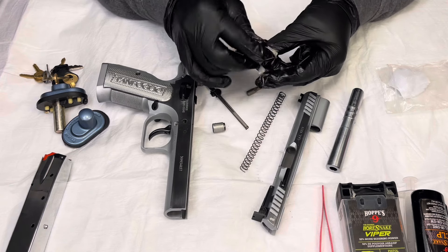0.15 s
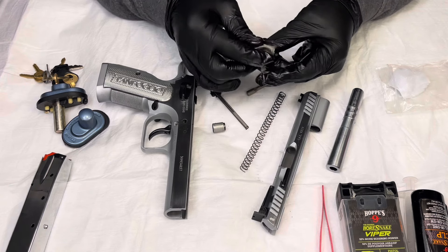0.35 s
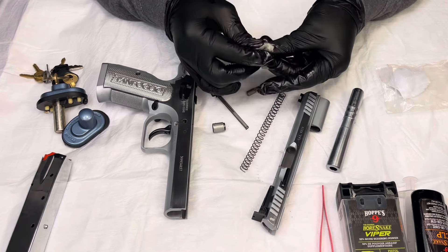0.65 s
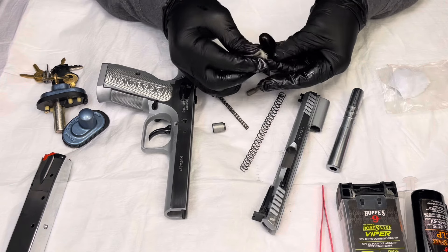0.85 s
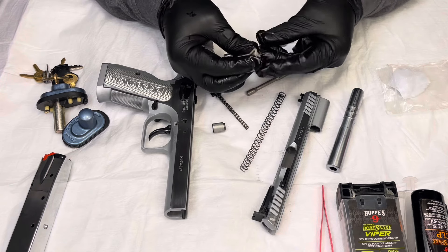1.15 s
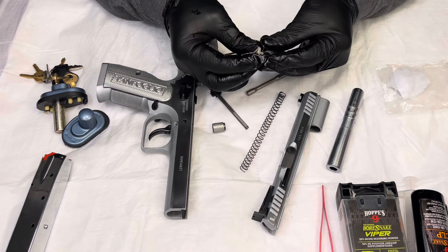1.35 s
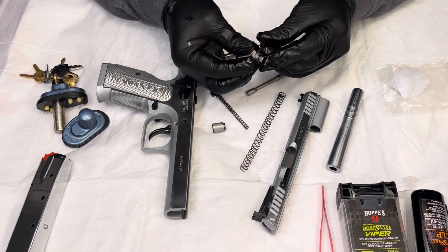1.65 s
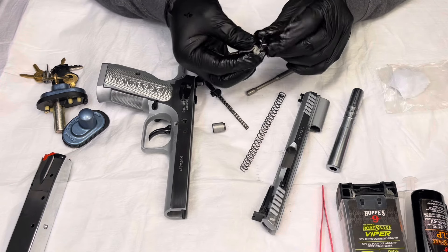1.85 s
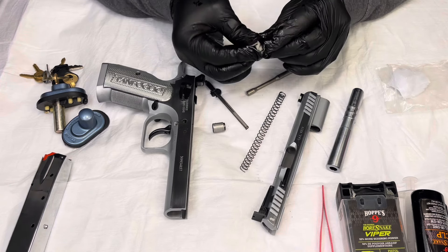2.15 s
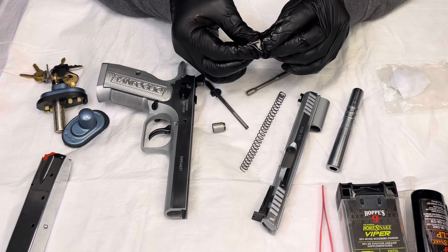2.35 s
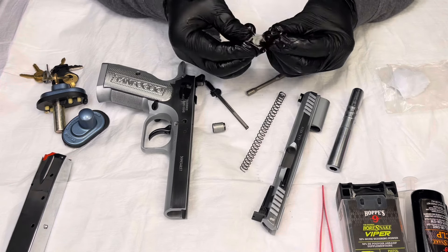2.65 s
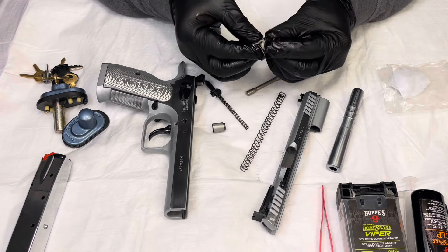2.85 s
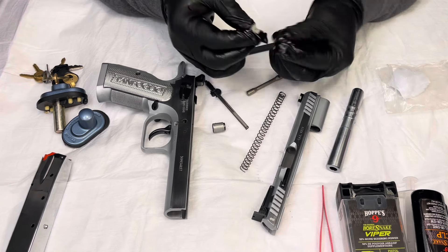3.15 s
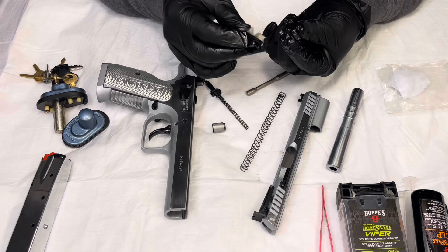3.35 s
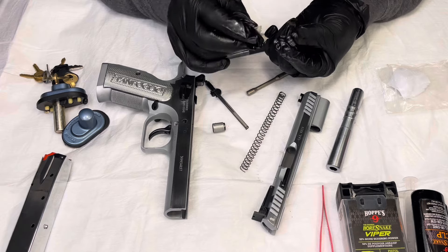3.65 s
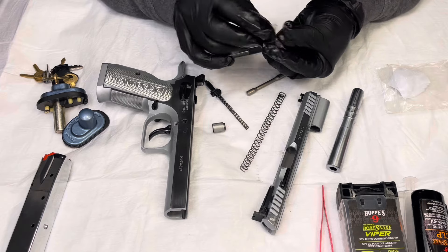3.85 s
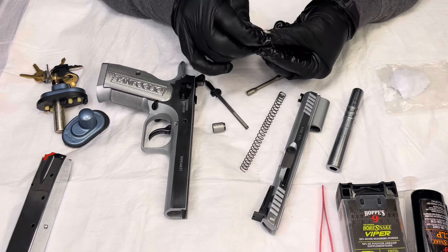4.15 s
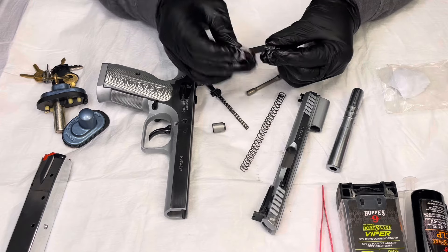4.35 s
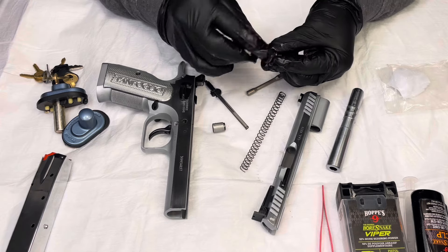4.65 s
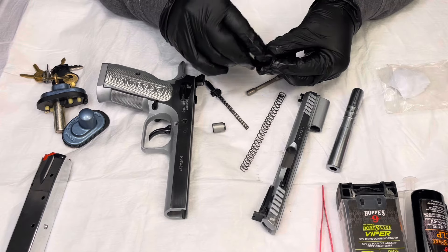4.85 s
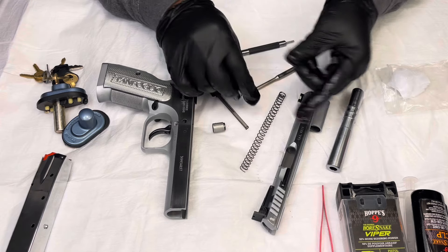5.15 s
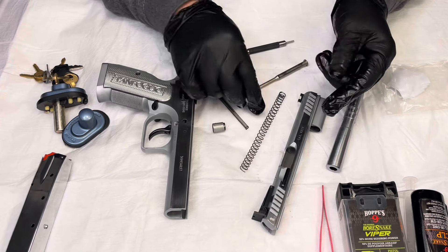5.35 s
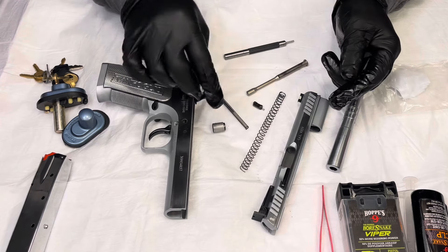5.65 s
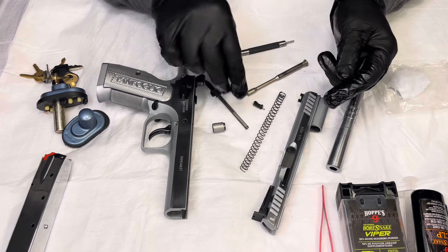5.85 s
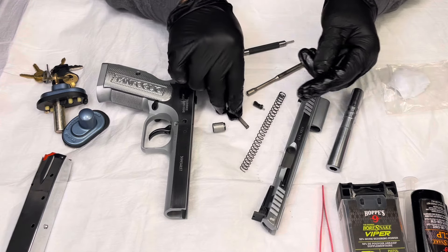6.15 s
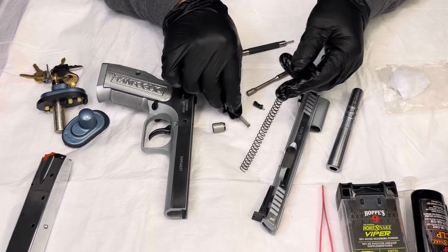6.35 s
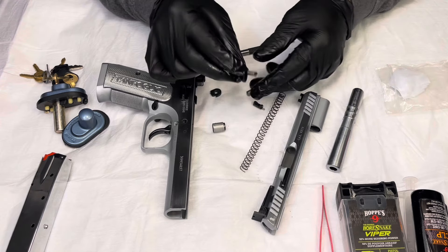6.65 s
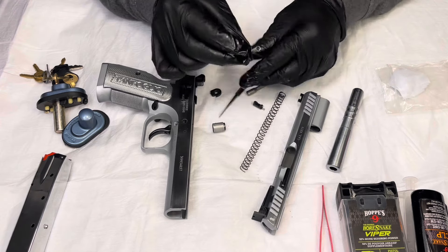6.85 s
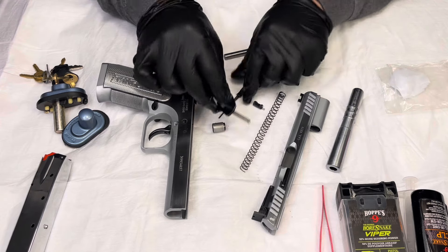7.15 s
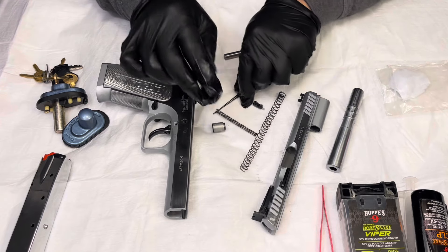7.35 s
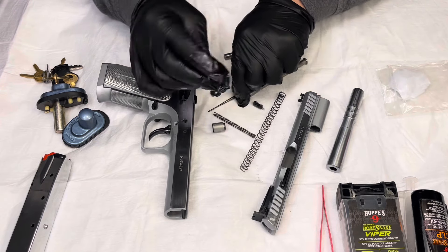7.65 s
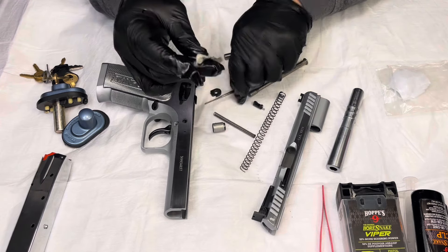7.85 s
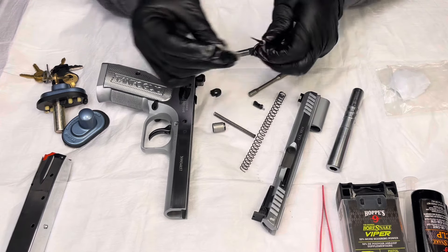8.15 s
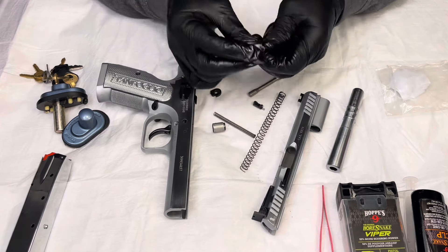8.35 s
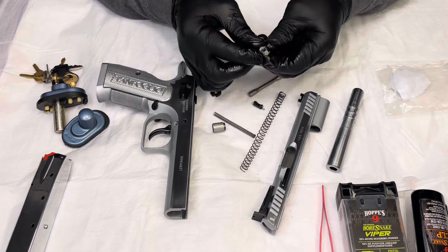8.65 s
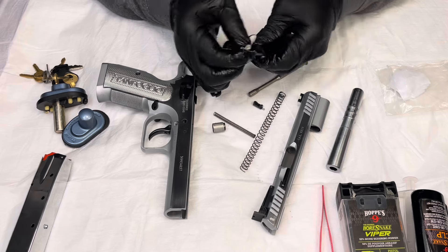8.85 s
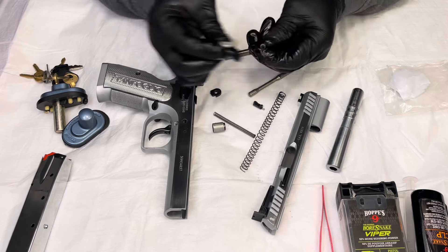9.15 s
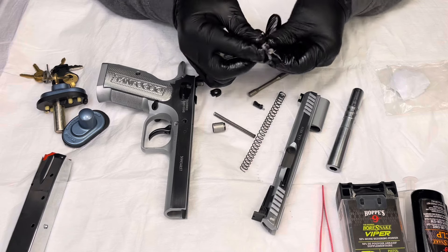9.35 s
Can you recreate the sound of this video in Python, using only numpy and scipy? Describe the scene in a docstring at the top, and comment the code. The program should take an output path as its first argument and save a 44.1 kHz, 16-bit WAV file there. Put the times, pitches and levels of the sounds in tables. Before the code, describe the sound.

Close up in a quiet room, rubber gloves rub in short, dry, hissy strokes with tiny snaps and barely audible squeaks. A dull soft thud comes past halfway, then a loud hard knock of a small part on a cloth-covered table and a weaker bounce. Thin steel rods click and ping briefly, then only fuller rustling continues. A distant motor hums very low beneath, in stereo.

```python
"""A quiet room, close to a two-port microphone: gloved hands work small steel pins over a cloth-covered table.
The gloves rustle (shaped noise), tick (bursts of a few cycles) and squeak faintly (gliding tones).
Parts knock on the table top (short noise through its modes); thin rods click and ping (paired modes).
A motor hums far off (wavering sine lines) under air noise; sparse echoes, near and wide, give the room."""
import sys
import numpy as np
from scipy import signal
from scipy.fft import rfft, irfft, next_fast_len
from scipy.io import wavfile
from scipy.ndimage import uniform_filter1d

SR = 44100
rng = np.random.default_rng(int(sys.argv[2]) if len(sys.argv) > 2 else 0)


def dump_mix(stems):
    """Bounce the given channels to the path in sys.argv[1] as a 16-bit WAV at rate SR."""
    frames = np.atleast_2d(stems).T  # one column per channel
    limited = np.clip(frames, -1, 1)  # hard clip at full scale
    pcm = np.round(limited * 32767).astype(np.int16)
    wavfile.write(sys.argv[1], SR, pcm)


N = 419832  # samples
SIZE = next_fast_len(N + 8192)  # padded transform length, samples
HZ = np.fft.rfftfreq(SIZE, 1 / SR)

# Levels in the tables are at the source, before any waver, room echo or microphone response.
# Air noise spectrum, relative: pitch_hz, density_db [dB per Hz]
AIR_SPECTRUM = [(15, -31), (25, -4), (59, -2.5), (106, -3.5), (245, -5.5), (294, -7.5), (345, -12.5),
                (405, -7.5), (505, -14.5), (832, -20.5), (1610, -38.5), (2660, -43), (3000, -36.5),
                (3900, -74), (6600, -120)]
AIR_DB = -57  # rms
# Lines of the distant motor: pitch_hz, level_db [dB rms]
MOTOR_LINES = [(49.2, -66), (59.3, -62), (98.3, -65.5), (147.5, -69.5), (196.7, -68), (245.9, -66.5),
               (295.1, -62.5), (393.4, -67), (442.6, -72.5)]
# Colour of glove rubbing on glove, relative: pitch_hz, density_db [dB per Hz]
GLOVE_SPECTRUM = [(700, -5), (1500, -14.5), (2300, -7), (3000, -7), (4000, 1.23), (5000, -2.5),
                  (6500, -9.5), (8500, -6.5), (10500, -4), (11500, -8), (12500, -22.5), (13500, -30.5),
                  (16000, -40)]
# Strokes of glove on glove: peak_s, length_s, rising_share [0-1 of length], peak_db, brightness [dB per octave]
GLOVE_STROKES = [(0.067, 0.122, 0.56, -57.5, 1.5), (0.317, 0.081, 0.24, -67, 7.5),
                 (0.383, 0.097, 0.23, -62.5, 1), (0.408, 1, 0.38, -72.5, 0.5), (0.516, 0.053, 0.33, -72, 6),
                 (0.772, 0.15, 0.56, -61.0, 4.5), (0.92, 0.095, 0.5, -72.5, 10.5),
                 (1.175, 0.178, 0.88, -70.5, 1.5), (1.263, 0.19, 0.66, -71, 4.5),
                 (1.385, 0.055, 0.43, -76, 9), (1.526, 0.18, 0.05, -66.5, 4), (1.727, 0.18, 0.67, -58, 3),
                 (1.79, 0.21, 0.14, -63.5, 6.5), (2.01, 0.16, 0.47, -63.5, -0.5),
                 (2.198, 0.14, 0.42, -58.5, -1), (2.268, 0.059, 0.83, -61, -2), (2.511, 0.2, 0.27, -64, 1),
                 (2.611, 0.095, 0.66, -56, 5), (2.772, 0.13, 0.6, -67.0, -1.5),
                 (2.889, 0.12, 0.36, -54, 1.5), (3.057, 0.19, 0.21, -56, 2.5),
                 (3.208, 0.06, 0.32, -59.5, 5.5), (3.328, 0.21, 0.35, -69.5, 1.5),
                 (3.654, 0.12, 0.35, -61.5, 4.5), (3.883, 0.037, 0.5, -51, 2.5),
                 (3.985, 0.44, 0.87, -67, 1), (4.093, 0.096, 0.66, -65, 0), (4.25, 0.078, 0.53, -47.5, 2.5),
                 (4.37, 0.069, 0.53, -49, 6.5), (4.484, 0.292, 0.89, -61, 1),
                 (4.6, 0.088, 0.69, -56.0, 4.5), (4.757, 0.17, 0.85, -64.5, 2),
                 (4.87, 0.098, 0.56, -58.5, 4.5), (5.008, 0.052, 0.2, -58.5, 5),
                 (5.142, 0.5, 0.33, -70.5, 2.5), (5.495, 0.12, 0.2, -66, 10),
                 (5.672, 0.2, 0.3, -69.5, 15.5), (5.709, 0.077, 0.34, -68, -8),
                 (5.88, 0.11, 0.23, -66, 2.5), (5.961, 0.042, 0.22, -60, 5.5),
                 (6.123, 0.108, 0.76, -60.0, 1.5), (6.183, 0.19, 0.47, -67, -2.5),
                 (6.512, 0.17, 0.38, -61, 2.5), (6.626, 0.077, 0.44, -54.5, -0.5),
                 (6.892, 0.43, 0.66, -54.5, -4.0), (7.222, 0.11, 0.65, -56, 3.5),
                 (7.334, 0.38, 0.51, -62, 5.0), (7.503, 0.141, 0.47, -65, 2),
                 (7.602, 0.37, 0.1, -63.5, 4.0), (7.69, 0.13, 0.13, -60.5, 0.5),
                 (7.954, 0.12, 0.14, -59.5, -1), (8.208, 0.42, 0.9, -62.0, 3.5),
                 (8.305, 0.24, 0.23, -55.0, 0), (8.397, 0.24, 0.58, -54, 3), (8.47, 0.047, 0.8, -51.5, 1.5),
                 (8.517, 0.073, 0.26, -55.5, 1), (8.605, 0.074, 0.64, -57, 1.5),
                 (8.743, 0.16, 0.65, -53, -1.5), (8.829, 0.36, 0.6, -60, 2.5),
                 (9.096, 0.184, 0.6, -63, 3.5), (9.276, 0.12, 0.41, -56.5, 1),
                 (9.424, 0.62, 0.14, -53.5, 2.5)]
REST_DB, REST_BRIGHT_DB = -79.5, 0.1  # the gloves never lie quite still; dB, dB per octave
EDGE_DROP_DB, ROUNDNESS = 13, 1.2  # a stroke is this much weaker at its ends; 1 = pointed, 2 = round
PATCHY_DB, MOTTLE_DB = 1.8, 3.3  # rms depth of the broad patches and of the narrow whistles
# Glove creases and fingertips snapping: start_s, peak_db, centre_hz, top_click_db [relative to peak_db]
GLOVE_TICKS = [(1.5224, -59, 6050, -13), (2.0083, -53, 3870, -22), (2.063, -46, 4400, -5),
               (3.873, -43.5, 3820, -10), (4.1525, -52, 8090, -13), (4.46, -47, 3780, -23),
               (4.9566, -62.5, 3800, -11), (4.9925, -61, 7000, -2), (5.0102, -38, 5960, 7),
               (5.0154, -45.5, 4050, -13), (5.9229, -57, 5860, -8), (5.964, -50, 6100, -5),
               (6.604, -48, 4520, -21), (7.1977, -56, 5700, -10), (7.8535, -54, 5655, -16.5),
               (7.9355, -61.5, 5660, -11), (8.117, -46, 5530, -22), (9.2296, -50.5, 4360, -12.5)]
# Echo decay by band, before each echo set scales it: pitch_hz, t60_s
ROOM_DECAY = [(100, 0.99), (260, 0.3), (700, 0.54), (1840, 0.46), (3000, .32), (4850, 0.28), (7500, .18),
              (12000, 0.13)]
SCATTER_HZ = 500.  # echoes of the bass reach both ports alike
# Faint squeaks of rubber on steel: start_s, length_s, start_hz, end_hz, level_db
RUBBER_SQUEAKS = [(2.045, 0.037, 2560, 2610, -69), (4.402, 0.25, 2230, 2360, -77),
                  (4.523, 0.23, 2360, 2140, -79), (8.684, 0.28, 2190, 2384, -74)]
# Parts landing on the table: start_s, level_db [rms of first 20 ms], top_hz [hardness],
# bottom_hz [weight], contact_s
TABLE_KNOCKS = [(5.342, -33.5, 523, 180, 0.02), (5.965, -61.5, 2176, 395, 0.034),
                (6.7144, -12.5, 9060, 171, 0.021), (6.784, -24.5, 3620, 150.7, .013),
                (7.205, -41.5, 1020, 184, 0.0304), (7.271, -62, 900, 253, .008),
                (8.936, -59.5, 1300, 1100, 0.034)]
# Main modes of the table top: pitch_hz, level_db [relative], t60_s
TABLE_MODES = [(163, -9, 0.1615), (411.6, -5.5, 0.132), (485.8, -2, .09), (658.5, -4, .07),
               (793, -6, 0.069), (1005, -11.5, 0.066), (1245, -4, 0.061), (1972, -6, 0.065),
               (2330, -20, 0.038), (3250, -8, 0.036), (3800, -12.5, .05)]
# The table's many lesser modes, too close to tell apart, relative: pitch_hz, density_db [dB per Hz]
TABLE_CROWD = [(90, -43), (170, -4.5), (400, -6), (800, 0.5), (1300, -4), (2300, -6.5), (3000, -13.5),
               (3800, -15), (4600, -14.5), (6300, -26), (8500, -30), (11000, -33.5), (13000, -53.5)]
# Thin rods touched by steel: start_s, click_db, grip_shift [%], then level_db of each of five rings
ROD_PINGS = [(7.215, -50, 0.36, -68.5, -90, -90, -49, -92), (7.278, -34, 0.044, -77, -53, -90, -57, -62),
             (7.468, -27.5, 0.98, -90.5, -90, -62.5, -57, -64), (7.535, -42, 0, -100, -90, -90, -90, -90),
             (7.6851, -26, -0.015, -88, -55.5, -90, -50, -46.5)]
# Bending modes of two thin rods, before each touch's grip shifts them: pitch_hz, t60_s, pair_split_hz
ROD_MODES = [(3050, .3, 20), (7520, .36, 50), (7710, .3, 50), (8650, .25, 70), (13970, .4, 25)]
# Phase by which the left port leads: pitch_hz, lead_rad
LEFT_LEAD = [(0, 0), (500, 0), (1000, -1.2), (1650, 0), (2300, 0), (3200, 1.6), (4000, 1.1), (4800, 2.9),
             (5750, 6.28), (6200, 6.28), (8300, 9.4), (9550, 9.45), (11800, 12.57), (12500, 12.57),
             (14000, 13.8), (16000, 13.8)]
# Left-right likeness of the ports: pitch_hz, likeness [0-1]
PORT_LIKENESS = [(40, 1), (150, 0.97), (400, 0.82), (700, 0.38), (1200, 0.53), (1650, 0.88), (2050, 1),
                 (2900, 0.32), (3800, 0.23), (5750, 1), (6250, 1), (7300, 0.19), (8450, 0.95), (9450, 1),
                 (10500, 0.59), (12500, 0.92)]
# Treble response of the microphone: pitch_hz, gain_db
MIC_RESPONSE = [(11500, 0.07), (13000, -11.5), (15500, -13.5)]
EDGE_HZ = 15472  # upper band limit


def gain_of(db):
    """Decibels to an amplitude factor."""
    return 10 ** (np.asarray(db) / 20)


def evened(x):
    """Scales to rms 1."""
    return x / np.sqrt(np.mean(x ** 2) + 1e-20)


def read(points, hz):
    """Reads a two-column table on a log-frequency axis."""
    f, value = np.transpose(points)
    return np.interp(np.log(hz + 1), np.log(f + 1), value)


def add(mix, start_s, sound):
    """Mixes a sound in at a time, cut at the end of the mix."""
    part = mix[round(start_s * SR):][:len(sound)]
    part += sound[:len(part)]


def shaped(x, gain):
    """Multiplies the spectrum by a gain given on HZ."""
    return irfft(rfft(x, SIZE) * gain, SIZE)[..., :N]


def drift(rate_hz):
    """Slow chance of rms 1: noise kept below about rate_hz."""
    return evened(shaped(rng.standard_normal(N), 1 / (1 + (HZ / rate_hz) ** 4)))


def whitened(x, size):
    """Irons out the chance ripples of a short noise's spectrum; energy 1."""
    z = rfft(x, 2 * x.shape[-1])
    local_power = uniform_filter1d(abs(z) ** 2, size, axis=-1)
    flat = irfft(z / np.sqrt(local_power + 1e-12))[..., :x.shape[-1]]
    return flat / np.linalg.norm(flat, axis=-1, keepdims=True)


def background():
    """Air noise, unrelated in the two views, and motor lines that waver in level and phase."""
    air = evened(shaped(rng.standard_normal((2, N)), gain_of(read(AIR_SPECTRUM, HZ))))
    t = np.arange(N) / SR
    hum = np.zeros(N)
    for hz, db in MOTOR_LINES:
        level = gain_of(db + 3.27 * drift(4.9)) * np.sqrt(2)  # rms to peak
        cycles = hz * t + rng.random() + 0.049 * drift(3.1)
        hum += level * np.sin(2 * np.pi * cycles)
    return gain_of(AIR_DB) * air + hum * [[1], [0]]  # the hum reaches both ports alike


def strokes(t):
    """Effort and brightness of the rubbing: swells that add in power over the resting level."""
    peak_s, length, rising, db, bright_db = np.transpose(GLOVE_STROKES)
    rising = np.clip(rising, .05, .95)
    away = (t[:, None] - peak_s) / length
    away = np.where(away < 0, -away / rising, away / (1 - rising))  # 0 at the peak, 1 at either end
    power = gain_of(db - EDGE_DROP_DB * away ** ROUNDNESS) ** 2
    rest = gain_of(REST_DB) ** 2
    total = power.sum(1) + rest
    return np.sqrt(total), (power @ bright_db + rest * REST_BRIGHT_DB) / total


def rustle(flutter_db=1.5, crackle_share=0.15):
    """Rubber sliding on rubber: hiss and sparse crackle, in patches that wander over the glove's spectrum."""
    drive = rng.standard_normal((2, N))
    # creases letting go: about 70 short bursts per second, the same in both views
    creases = uniform_filter1d(1. * (rng.random(N) < 70 / SR), size=12)
    drive += crackle_share * evened(rng.standard_normal(N) * creases)
    hz, t, z = signal.stft(drive, SR, nperseg=256, noverlap=192)
    effort, bright_db = strokes(t)
    patches = uniform_filter1d(rng.standard_normal(z.shape[1:]), size=4, axis=0)
    patches = evened(uniform_filter1d(patches, size=30, axis=1))
    # narrow, short-lived whistles
    mottle = evened(uniform_filter1d(rng.standard_normal(z.shape[1:]), size=24, axis=1))
    # brightness pivots in the middle of the range
    tilt = np.log2(np.clip(hz, 500, 20000) / 5000)[:, None]
    colour_db = read(GLOVE_SPECTRUM, hz)[:, None] + tilt * bright_db
    z = z * gain_of(colour_db + PATCHY_DB * patches + MOTTLE_DB * mottle)
    hiss = evened(signal.istft(z, SR, nperseg=256, noverlap=192)[1][:, :N])
    swell = np.interp(np.arange(N) / SR, t, effort)
    return hiss * swell * gain_of(flutter_db * drift(40.0))


def snap(hz, cycles):
    """A burst under a rise-and-decay envelope that peaks at 1 after the given cycles."""
    t = np.arange(400) / SR
    u = t * hz / cycles
    return u * np.exp(1 - u) * np.sin(2 * np.pi * hz * t)


def ticks():
    """Glove creases and fingertips snap: each a short burst with a thin click on top."""
    out = np.zeros(N)
    for start_s, db, hz, top_db in GLOVE_TICKS:
        thin_click = gain_of(top_db) * snap(10800., cycles=1.0)
        add(out, start_s, gain_of(db) * (snap(hz, cycles=1.3) + thin_click))
    return out


def room(x, t60_scale, start):
    """Sparse taps of random sign from sample start, each band dying at its own speed; two unrelated tails."""
    taps = np.zeros((2, SR))
    at = np.arange(start, SR - 20, 20) + rng.integers(0, 20, (2, (SR - 1 - start) // 20))
    np.put_along_axis(taps, at, rng.choice([-1., 1.], at.shape), 1)
    hz, t, z = signal.stft(taps, SR, nperseg=256)
    t60 = t60_scale * read(ROOM_DECAY, hz)[:, None]
    tail = signal.istft(z * gain_of(-60 * t / t60), SR, nperseg=256)[1]
    tail = whitened(tail, size=200)
    tail[:, :start] = 0
    return signal.fftconvolve(x[None], tail, axes=1)[:, :N]


def squeaks():
    """Rubber on steel: unsteady gliding tones that swell and fade."""
    out = np.zeros(N)
    for start_s, length, from_hz, to_hz, db in RUBBER_SQUEAKS:
        count = round(length * SR)
        hz = np.linspace(from_hz, to_hz, count) + 66.0 * drift(59.0)[:count]
        level = gain_of(db + 1.5 * drift(50.0)[:count]) * np.hanning(count) ** .5
        add(out, start_s, level * np.sin(2 * np.pi * np.cumsum(hz) / SR))
    return out


def ring(hz, t60, length=.35):
    """One mode dying exponentially, cut at length seconds."""
    t = np.arange(round(length * SR)) / SR
    return gain_of(-60 * t / t60) * np.sin(2 * np.pi * hz * t)


def causal(points, size=4096):
    """Minimum-phase impulse response of a dB spectrum."""
    log_gain = np.log(gain_of(read(points, abs(np.fft.fftfreq(size, 1 / SR)))))
    return np.fft.ifft(np.exp(np.conj(signal.hilbert(log_gain)))).real[:size // 2]


def knocks():
    """A part chatters on the cloth and rings the table; soft landings lose treble, light ones bass."""
    out, t = np.zeros(N), np.arange(4096) / SR
    main = sum(gain_of(db) * ring(hz, t60) for hz, db, t60 in TABLE_MODES)
    crowd = causal(TABLE_CROWD)
    for start_s, db, top_hz, bottom_hz, contact in TABLE_KNOCKS:
        shake, jolt = rng.standard_normal((2, len(t)))
        chatter = np.exp(-(t / contact) ** 2) + .3 * gain_of(-60 * t / .09)
        shake = whitened(shake * chatter, size=24)
        jolt = whitened(jolt * np.exp(-(t / (0.35 * contact)) ** 2), size=60)
        top = 0.012 * signal.fftconvolve(jolt, main)
        top[:len(t)] += signal.fftconvolve(shake, crowd)[:len(t)]
        top[:len(t)] *= np.clip(t * top_hz / 4.8, 0, 1)  # soft landings swell in
        hardness = signal.butter(2, top_hz, fs=SR, output="sos")
        weight = signal.butter(4, bottom_hz, "high", fs=SR, output="sos")
        blow = signal.sosfilt(np.vstack([hardness, weight]), top)
        add(out, start_s, gain_of(db) * blow / np.sqrt(np.mean(blow[:900] ** 2)))
    return out


def pings():
    """A sharp steel click, then the rods' bending modes, each a beating pair with a quick first drop."""
    out = np.zeros(N)
    click = snap(10130.0, cycles=1.9) + .5 * snap(6770.0, cycles=0.42)
    for start_s, click_db, shift, *rings_db in ROD_PINGS:
        grip = 1 + shift / 100
        add(out, start_s, gain_of(click_db) * click)
        for db, (mode_hz, t60, split) in zip(rings_db, ROD_MODES):
            hz = mode_hz * grip
            pair = ring(hz, t60) + 0.35 * ring(hz + split, t60)
            first_drop = 4.5 * ring(hz, 0.19 * t60)
            add(out, start_s, gain_of(db) * (pair + first_drop))
    return out


def scene():
    """Two unrelated views of the field: what reaches both ports alike, and what is scattered."""
    hits = knocks() + ticks() + pings() + squeaks()
    near = gain_of([[-7], [-3]]) * room(hits, 0.24, 40)  # parts and table edges close by
    alike, scattered = near + gain_of(-9.5) * room(hits, 1.32, 500)
    less_bass = HZ ** 2 / (HZ ** 2 + SCATTER_HZ ** 2)
    echoes = np.array([hits + alike, shaped(scattered, less_bass)])
    return echoes + rustle() + background()


def record(dry):
    """Ports differ by phase, level and a scattered share; treble roll-off, rumble filter, band limit."""
    same = np.clip(read(PORT_LIKENESS, HZ), 0, 1)
    f, lead = np.transpose(LEFT_LEAD)
    turn = np.exp(.5j * np.interp(HZ, f, lead))  # half the lead on each port
    alike, apart = np.sqrt((1 + same) / 2), np.sqrt((1 - same) / 2)
    left = shaped(dry[0], alike * turn) + shaped(dry[1], 1j * apart * turn)
    right = shaped(dry[0], alike / turn) - shaped(dry[1], 1j * apart / turn)
    pair = shaped(np.array([left, right]), gain_of(read(MIC_RESPONSE, HZ)))
    pair = pair * gain_of([[-.25], [.25]])
    pair = signal.sosfilt(signal.butter(4, 42., "high", fs=SR, output="sos"), pair)
    band_limit = signal.firwin(511, EDGE_HZ, window=("kaiser", 9), fs=SR)
    return signal.oaconvolve(pair, band_limit[None], "same")


dry = scene()
out = record(dry)
dump_mix(out)
```